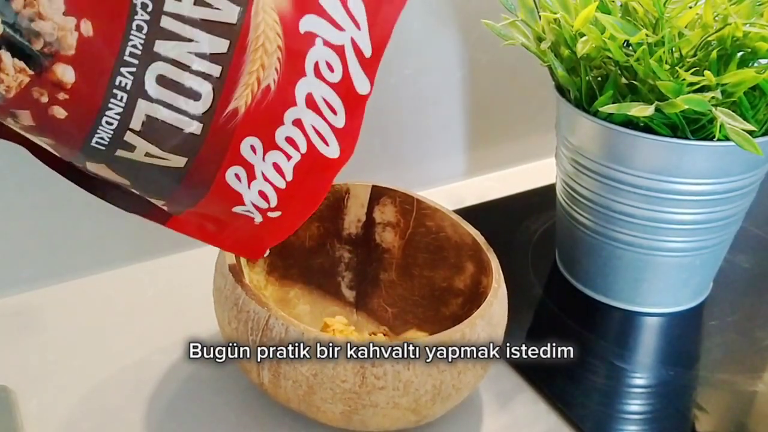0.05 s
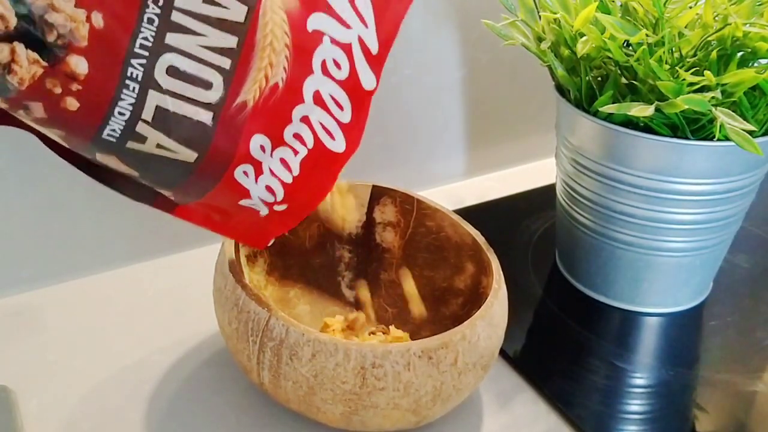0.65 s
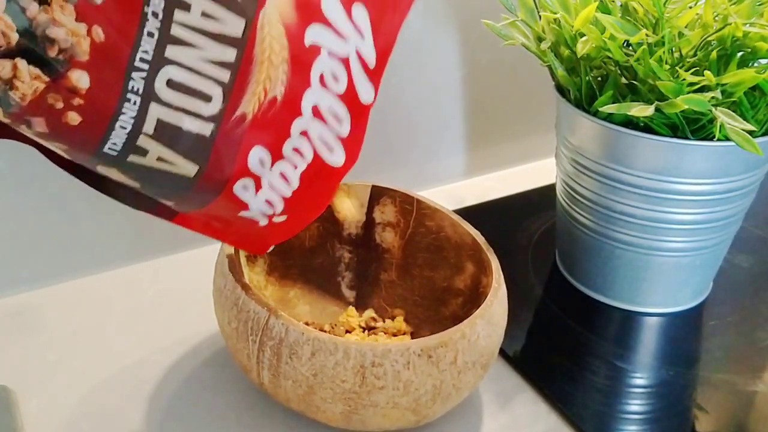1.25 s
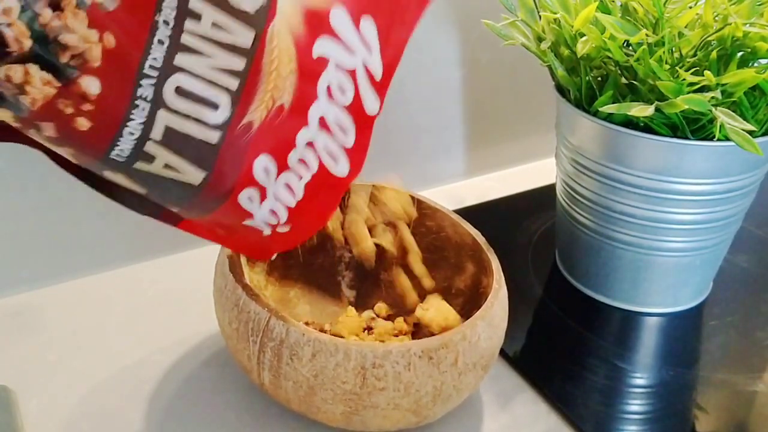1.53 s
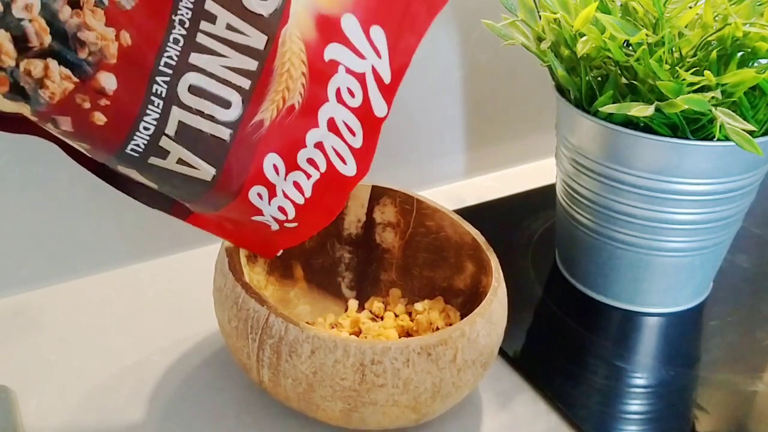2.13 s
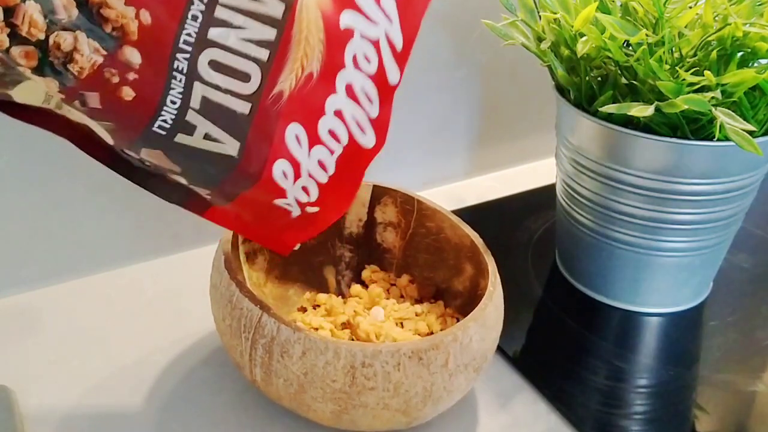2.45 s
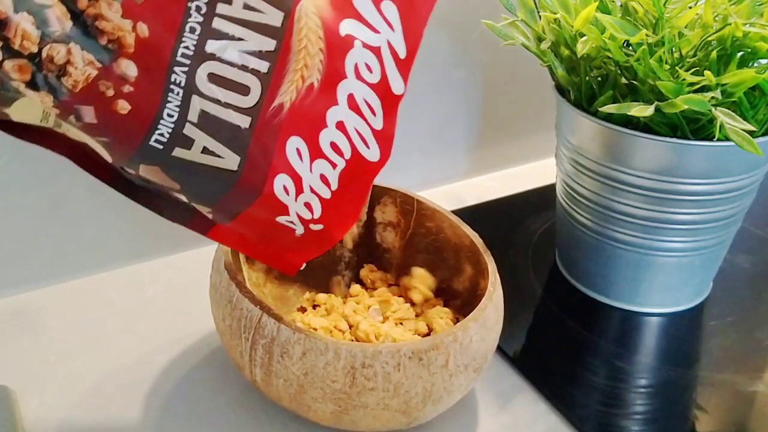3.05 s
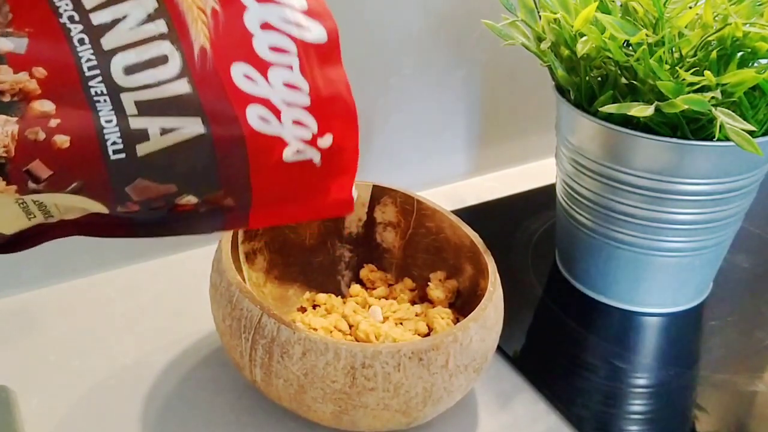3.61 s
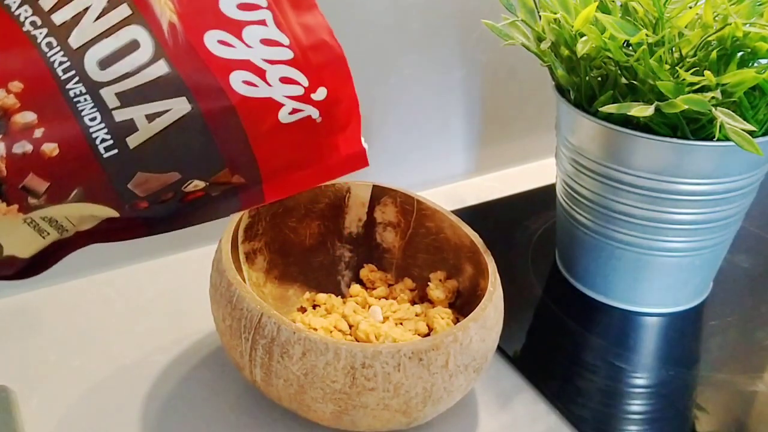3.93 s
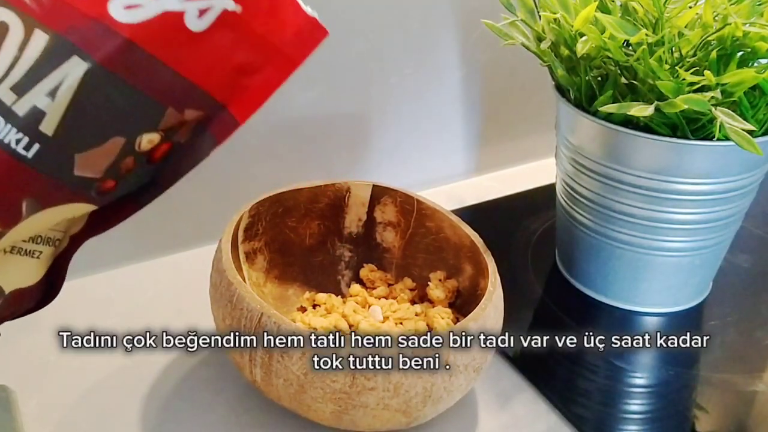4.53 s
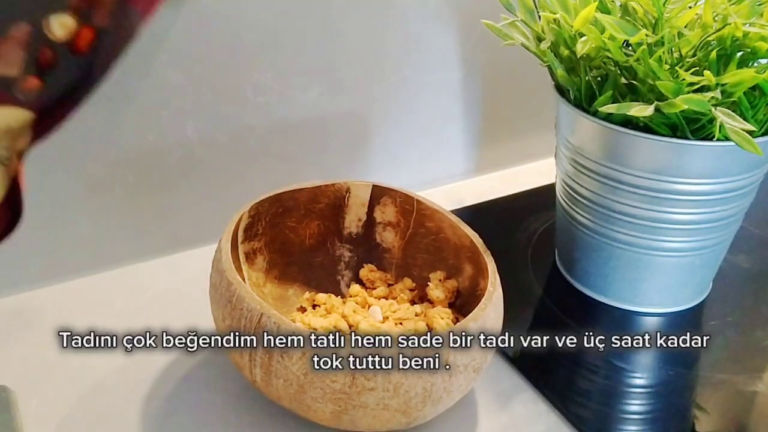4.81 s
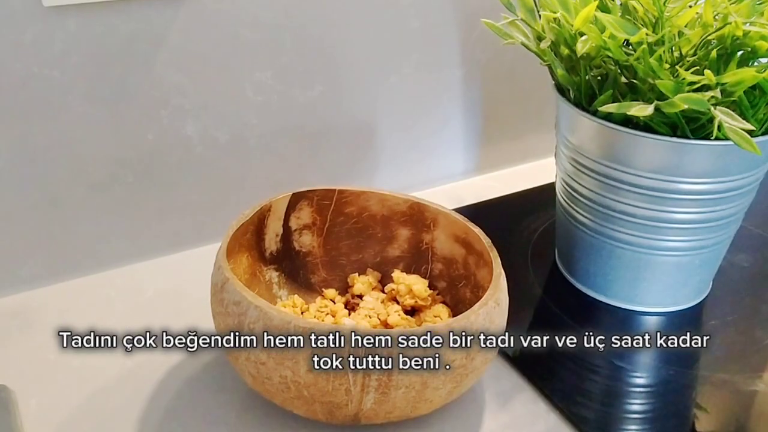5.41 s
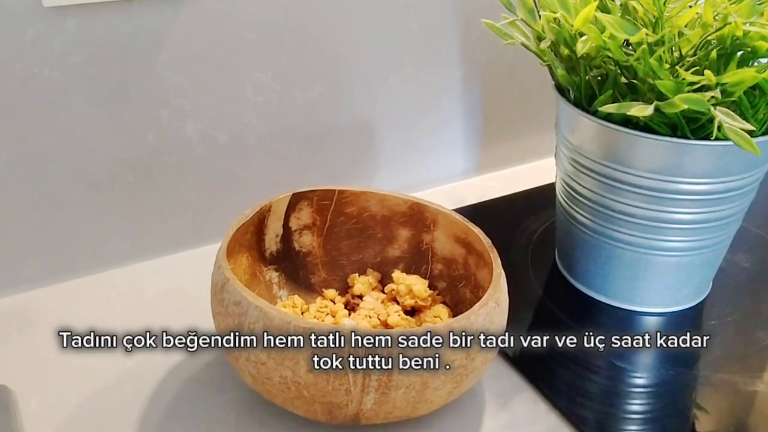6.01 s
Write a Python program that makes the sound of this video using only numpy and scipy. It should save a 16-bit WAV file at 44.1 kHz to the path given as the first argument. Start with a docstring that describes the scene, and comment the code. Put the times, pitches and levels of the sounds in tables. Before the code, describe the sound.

A plastic bag crinkles and snaps while dry cereal clusters rattle into a bowl, ending with a sliding rush that cuts off.

```python
"""Kitchen counter: granola is shaken from a plastic pouch into a coconut-shell bowl. The film snaps and
crackles; clusters slide and tumble in the pouch, drop and ring the hollow shell. The pouch is tipped upright
and its contents rush back; then all but the background breaks off abruptly. Room tone, a low handling rumble
and one faint whistle remain."""
import sys
import numpy as np
from scipy import signal
from scipy.fft import rfft, irfft, next_fast_len
from scipy.io import wavfile
from scipy.ndimage import uniform_filter1d

SR = 44100
rng = np.random.default_rng(int(sys.argv[2]) if len(sys.argv) > 2 else 0)


def store_wav(level_fs):
    """Save 16-bit WAV to argv[1]."""
    pcm = np.round(np.clip(np.atleast_2d(level_fs), -1, 1) * 32767)
    wavfile.write(sys.argv[1], SR, pcm.T.astype(np.int16))


N = 276066

# granola moving in the pouch: time_s, slide_db, crackle_db
FLOW = [(0.0, -45.5, -40), (0.1, -54, -67), (0.189, -42.5, -46), (0.42, -49, -62), (0.55, -46, -43),
        (0.72, -48, -59), (1.17, -54.5, -60), (1.23, -51.5, -58), (1.48, -42, -53), (1.6, -45, -41),
        (1.85, -54, -49.5), (2.0, -59.5, -54), (2.07, -45.5, -54.5), (2.35, -54.5, -58.5),
        (2.73, -47, -56.5), (2.87, -60, -67), (3.07, -60.5, -65), (3.3, -73, -83), (3.57, -66.5, -71.5),
        (3.701, -75.5, -80.5), (3.82, -61.5, -75.5), (3.95, -68, -77), (4.32, -58.5, -65.5),
        (4.5, -71.5, -74)]


def from_db(db):
    """Decibels to gain."""
    return 10 ** (np.asarray(db) / 20)


def rms_one(x):
    """Scale to unit rms."""
    return x / np.sqrt(np.mean(x ** 2) + 1e-20)


def unit_hit(x):
    """Scale to the energy of 4 ms at rms 1."""
    return x / np.sqrt(np.sum(x ** 2) / (SR / 250) + 1e-20)


def in_time(rows):
    """Curve columns at every sample."""
    time_s, *columns = np.transpose(rows)
    return [np.interp(np.arange(N) / SR, time_s, column) for column in columns]


def at_hz(points, hz):
    """Read a table on a log-frequency axis."""
    freq_hz, value = np.transpose(points)
    return np.interp(np.log(hz + 0.0009), np.log(freq_hz), value)


def while_moving(rows):
    """1 until a curve's last row, then a 0.1 s fade."""
    return np.clip(1 - 10 * (np.arange(N) / SR - rows[-1][0]), 0, 1)


def add(out, start_s, sound):
    """Mix a sound in at start_s."""
    i = max(int(start_s * SR), 0)
    out[i:i + len(sound)] += sound[:N - i]


def band(x, low_hz, high_hz):
    """Causal band-pass."""
    sos = signal.butter(2, [low_hz, min(high_hz, SR / 2 - 1000)], "band", fs=SR, output="sos")
    return signal.sosfilt(sos, x)


def colour(x, spectrum):
    """Minimum-phase shaping, so clicks stay sharp; rms 1."""
    size = 2 * next_fast_len(N // 2 + SR // 10)
    gain = from_db(at_hz(spectrum, np.fft.rfftfreq(size, 1 / SR)))
    cepstrum = irfft(np.log(gain))
    cepstrum[1:size // 2] *= 2
    cepstrum[size // 2 + 1:] = 0
    return rms_one(irfft(rfft(x, size) * np.exp(rfft(cepstrum)))[:N])


def ring(x, hz, t60_s):
    """One mode: a unit click starts a decaying sine of height 1."""
    r, w = np.exp(-np.log(1000) / (t60_s * SR)), 2 * np.pi * hz / SR
    return signal.lfilter([0, np.sin(w)], [1, -2 * r * np.cos(w), r * r], x + 1e-18)


def resonance(x, hz, width_hz):
    """Two-pole resonance, peak gain 1."""
    r, w = np.exp(-np.pi * width_hz / SR), 2 * np.pi * hz / SR
    return signal.lfilter(np.array([1, 0, -1]) * (1 - r * r) / 2, [1, -2 * r * np.cos(w), r * r], x + 1e-18)


def drift(rate_hz):
    """Random wander, rms 1."""
    position = np.arange(N) / SR * rate_hz
    values = rng.standard_normal(N // 100)
    return rms_one(np.interp(position, np.arange(len(values)), values))


def grains(per_s, spread_db, low_hz, high_hz, q, count=16):
    """Tiny random contacts of uneven size, each ringing at one of count pitches."""
    sizes = from_db(spread_db * np.minimum(rng.exponential(1, N), 3.5)) * rng.choice([-1, 1], N)
    clicks = sizes * (rng.random(N) < per_s / SR)
    pitch_index = rng.integers(0, count, N)
    pitches_hz = np.geomspace(low_hz, high_hz, count)
    out = sum(resonance(clicks * (pitch_index == k), hz, hz / q) for k, hz in enumerate(pitches_hz))
    power = np.abs(uniform_filter1d(out ** 2, SR // 10))
    return out / np.sqrt(power + 1e-12)   # levelled over 0.1 s


def burst(decay_s, ragged_db):
    """A run of micro-fractures: instant onset, exponential decay."""
    t = np.arange(SR // 16) / SR
    noise, sizes = rng.standard_normal((2, len(t)))
    return noise * from_db(ragged_db * sizes) * np.exp(-t / decay_s)


def strays(until_s, level_db, count, spread_db=0.5):
    """Small random events that follow the sliding level: start_s, level_db, chance (spread 1)."""
    when, size, kind = rng.random((count, 3)).T
    start_s = until_s * (np.arange(count) + when) / count
    flow_s, slide_db, _ = np.transpose(FLOW)
    db = np.interp(start_s, flow_s, slide_db) + level_db + spread_db * (2 * size - 1)
    return zip(start_s, db, np.sqrt(12) * (kind - .5))


def kitchen(x, near_db, near_t60_s, room_db):
    """Quick reflections from pouch, counter and wall, then a tail whose treble dies first."""
    # reverberation: freq_hz, t60_s
    decay = [(300, .45), (1000, 0.54), (3500, 0.19), (8000, 0.23), (15000, .2)]
    t = np.arange(SR // 2) / SR
    edges_hz = np.geomspace(120, 18000, 9)
    near = rng.standard_normal(len(t)) * from_db(-60 * t / near_t60_s) * (t > .002)
    tail = np.zeros(len(t))
    for low_hz, high_hz in zip(edges_hz, edges_hz[1:]):
        t60_s = at_hz(decay, np.sqrt(low_hz * high_hz))
        tail += band(rng.standard_normal(len(t)), low_hz, high_hz) * from_db(-60 * t / t60_s) * (t > .008)
    echo = from_db(near_db) * near / np.linalg.norm(near) + from_db(room_db) * tail / np.linalg.norm(tail)
    return x + signal.fftconvolve(x, echo)[:N]


def background(tone_db=-67.0, rumble_gain_db=3.5):
    """Steady room tone and the uneven rumble of a hand-held microphone."""
    # spectra: freq_hz, density_db
    tone_spectrum = [(25, -10), (50, -24.5), (100, -26.5), (165, -27), (215, -38), (350, -30), (530, -33.5),
                     (900, -27.5), (1500, -32.5), (2400, -40.5), (3300, -45.5), (5000, -57), (16000, -58)]
    rumble_spectrum = [(15, 6), (26, 8), (38, -3), (50, -0.5), (70, -0.5), (100, -2), (170, -2),
                       (215, -19.5), (500, -44)]
    # rumble envelope: time_s, level_db
    handling = [(0.0, -60), (3.1, -62.5), (3.5, -70), (5.07, -60.5), (5.5, -79), (6.26, -71.5)]
    handling_db, = in_time(handling)
    tone = from_db(tone_db) * colour(rng.standard_normal(N), tone_spectrum)
    rumble_gain = from_db(handling_db + rumble_gain_db + 1.5 * drift(2.2))
    return tone + rumble_gain * colour(rng.standard_normal(N), rumble_spectrum)


def whistle(start_s=5.75, length_s=.36, pitch_hz=3255, level_db=-90):
    """A barely audible tone, wavering in pitch and level."""
    out, size = np.zeros(N), int(length_s * SR)
    envelope = from_db(level_db + 2 * drift(30)[:size]) * signal.windows.tukey(size, .2)
    phase = 2 * np.pi * np.cumsum(pitch_hz + 15 * drift(25)[:size]) / SR
    add(out, start_s, envelope * np.sqrt(2) * np.sin(phase))
    return out


def granola(slide_gain_db=-2.0, crackle_gain_db=2.5, scrape_gain_db=-4.0, clack_db=-8.0):
    """Clusters grind and clack, crumbs tick in clumps on the film, the shaken film scrapes."""
    # spectra: freq_hz, density_db
    grind_spectrum = [(120, -17), (190, -6), (240, -2), (350, 5.5), (560, -3), (720, -0.5), (900, 6.5),
                      (1050, -0.5), (1300, 2), (1900, -3.5), (2800, -2), (4000, -17.5), (6500, -23),
                      (16000, -34)]
    crackle_spectrum = [(2500, -13.5), (4200, 4.5), (5500, -2), (7000, -2), (8300, 5.5), (9600, -4),
                        (12000, -3.5), (15500, 0)]
    scrape_spectrum = [(1500, -23.5), (2700, -9.5), (3600, 2.5), (4400, -1), (6000, -12), (12000, -33)]
    # film scrape envelope: time_s, level_db
    shaking = [(0.0, -39.5), (0.14, -62), (0.42, -49.5), (0.72, -35.5), (0.92, -51.5), (1.22, -61),
               (1.52, -38.5), (2.0, -65)]
    slide_db, crackle_db = in_time(FLOW)
    scrape_db, = in_time(shaking)
    grind = grains(per_s=2400, spread_db=4.0, low_hz=166, high_hz=9000, q=3.6, count=24)
    clack = grains(per_s=150, spread_db=4.5, low_hz=789, high_hz=2980, q=17.0, count=24)
    slide = colour(grind, grind_spectrum) + from_db(clack_db) * band(clack, 650, 3400)
    ticks = grains(per_s=4000, spread_db=3.5, low_hz=3500, high_hz=15000, q=7.6)
    crackle = colour(ticks * from_db(5 * drift(70)), crackle_spectrum)
    rubs = grains(per_s=480, spread_db=3.0, low_hz=2400, high_hz=5200, q=19.0)
    scrape = from_db(scrape_db + scrape_gain_db) * colour(rubs, scrape_spectrum)
    pouring = from_db(slide_db + slide_gain_db) * slide + from_db(crackle_db + crackle_gain_db) * crackle
    return pouring * while_moving(FLOW) + scrape * while_moving(shaking)


def rush(start_s=4.314, rise_s=0.74, level_db=-40.5, surge_db=2.5, contacts_per_s=9000):
    """The whole load slides back: contacts merge into a surging scrape that swells, then holds."""
    # freq_hz, density_db
    spectrum = [(160, -31), (230, -2), (360, 1.5), (560, -4.5), (850, -0.5), (1050, -1), (1350, 2.5),
                (1900, -6), (2900, -5.5), (4200, -13.5), (6500, -18.5), (8300, -12.5), (11000, -22.5),
                (15500, -16.5)]
    swell = np.clip((np.arange(N) / SR - start_s) / rise_s, 0, 1) ** 1.5
    contacts = rng.standard_normal(N) * (rng.random(N) < contacts_per_s / SR)
    contacts *= from_db(2 * drift(250))
    return swell * from_db(level_db + surge_db * drift(25)) * colour(contacts, spectrum)


def tumbles(gain_db=5.5, body_db=-11.0, stray_hz=1550, stray_octaves=.4):
    """Clusters fall on the slack pouch wall: dull, broad knocks over a low body."""
    # start_s, level_db, pitch_hz
    knocks = [(0.17, -50, 1470), (0.183, -39.5, 1400), (0.338, -47, 2030), (0.356, -48, 1260),
              (0.82, -42, 1560), (1.013, -46, 1220), (1.265, -43, 1500), (1.356, -46.5, 1580),
              (1.45, -33.5, 910), (1.489, -40, 2670), (2.0625, -37.5, 1920), (2.112, -43, 1030),
              (2.243, -37, 1080), (2.283, -45.5, 1420), (2.437, -48.5, 1090), (2.491, -43, 2003),
              (2.554, -41, 1090), (2.573, -47, 1280), (2.699, -46.5, 1457), (2.867, -57, 1200),
              (3.23, -58.5, 1116), (3.42, -64, 1460), (3.57, -59.5, 2060), (3.755, -56.5, 1030),
              (3.788, -56, 1280), (3.901, -61, 2290), (4.108, -59.5, 880), (4.18, -55, 1180),
              (4.209, -56.5, 1460), (4.285, -51, 1470), (4.575, -57, 1400), (4.66, -51, 1290),
              (4.812, -41.5, 1240), (4.878, -35, 1320), (4.993, -46, 1570)]
    small = [(start_s, db, stray_hz * 2 ** (stray_octaves * chance))
             for start_s, db, chance in strays(FLOW[-1][0], level_db=1.0, count=24)]
    out = np.zeros(N)
    for start_s, db, pitch_hz in knocks + small:
        contact = burst(0.0037, ragged_db=6.5)
        knock = unit_hit(band(resonance(contact, pitch_hz, width_hz=900), 750, 3400))
        body = from_db(body_db) * unit_hit(band(contact, 380, 710))
        add(out, start_s, from_db(db + gain_db) * (knock + body))
    return out


def shell(mode_gain_db=-4.0, heap_gain_db=-2.0, thud_below_hz=600):
    """Each landing strikes the shell's modes and thumps on the heap in the bowl."""
    # freq_hz, level_db, t60_s
    modes = [(238, -10, 0.26), (329.4, -7, 0.27), (360, -9, 0.15), (500, -6, 0.069), (657, -21.5, 0.08),
             (825, -11, 0.15), (901, -0.5, 0.062), (1003, -8.5, 0.05), (1313, -9, 0.043)]
    # start_s, ring_db, thud_db
    landings = [(0.129, -35.5, -52.5), (0.299, -38.5, -48.5), (0.448, -31.5, -43.5), (0.471, -40, -50),
                (0.555, -31, -48.5), (0.591, -34, -50), (0.679, -31, -46.5), (0.798, -40.5, -56),
                (1.443, -23, -52.5), (1.447, -22.5, -32.5), (1.557, -29, -45), (2.064, -35, -43),
                (2.555, -37, -47.5), (2.889, -46.5, -52.5), (2.916, -33.5, -48), (2.976, -49, -54)]
    out = np.zeros(N)
    for k, (hz, mode_db, t60_s) in enumerate(modes):
        blows = np.zeros(N)
        for start_s, ring_db, thud_db in landings:
            blow_db = thud_db if hz < thud_below_hz else ring_db
            # the cluster hits, its crumbs bounce on
            crumbs = burst(0.014, ragged_db=-1.5)
            blow = signal.unit_impulse(len(crumbs)) + 1.6 * crumbs / np.linalg.norm(crumbs)
            add(blows, start_s, from_db(blow_db + mode_db + mode_gain_db) * blow)
        out += (-1) ** k * ring(blows, hz, t60_s)
    for start_s, _, thud_db in landings:
        thump = unit_hit(band(burst(0.01, ragged_db=2.5), 220, 850))
        add(out, start_s, from_db(thud_db + heap_gain_db) * thump)
    return out


def fracture(decay_s, first_db=-10.5, flutter_db=-6.5):
    """A sharp first break, a run of smaller ones, then the flutter of crumpled film."""
    first = from_db(first_db) * unit_hit(burst(.0007, ragged_db=2.0))
    run = unit_hit(burst(decay_s, ragged_db=1.5))
    flutter = from_db(flutter_db) * unit_hit(burst(0.012, ragged_db=4.5))
    return first + run + flutter


def cracks(shaking_end_s=2.0, stray_decay_s=.0035, fizz_db=-3.0, film_hz=8350, film_db=3.5):
    """Film and brittle clusters crack; the film rings. Brighter: weaker, higher crunch, more fizz."""
    # start_s, level_db, brightness_db, decay_s
    breaks = [(0.045, -37, -4, .009), (0.125, -36, -2, .007), (0.203, -28, -0.5, .003),
              (0.2069, -25, -1.5, .005), (0.241, -33.5, 1, .004), (0.255, -34, -0.5, .004),
              (0.298, -23, -2.5, .004), (0.44, -44, -9.5, .01), (0.4489, -26.5, -4, .007),
              (0.452, -27, 1.5, .003), (0.473, -33.5, 0, .006), (0.519, -33.5, 8.5, .005),
              (0.556, -31.5, -4.5, .007), (0.564, -33, 8.5, .0035), (0.594, -43, -10, .007),
              (0.6783, -28.5, -13, .005), (0.702, -23.5, 7.5, .004), (0.734, -45, -14, .003),
              (0.796, -28.5, 2.5, .007), (0.847, -40, -1, .004), (0.9128, -25, 9, .0035),
              (0.931, -47, -16, .004), (0.993, -45.5, -7, .004), (1.013, -52.5, -13, .003),
              (1.093, -27, 16, 0.0046), (1.235, -44, 6, .0035), (1.268, -44.5, -6, .005),
              (1.317, -38, -4, .008), (1.365, -35.5, 2, .005), (1.444, -27, -1.5, .008),
              (1.474, -32, -3, .005), (1.518, -26, 7, 0.0032), (1.526, -24.5, 4, 0.0067),
              (1.535, -26.5, 4, .005), (1.556, -25.5, 8, .0055), (1.585, -25, 2.5, .009),
              (1.625, -28.5, 13.5, .0035), (1.69, -26.5, 13.5, .004), (1.709, -34, 9, .0035),
              (1.76, -34.5, 6, .006), (1.787, -36, 1, 0.0044), (1.823, -30.5, 10.5, .0045),
              (1.845, -36.5, -0.5, .005), (1.904, -32, -1, .007), (1.92, -36.5, 5, 0.0038),
              (2.0025, -35, 6, 0.0042), (2.062, -41, -2.5, .008), (2.308, -35.5, 5.5, .01),
              (2.399, -43.5, 22, .0025), (2.9154, -35, -5.5, .004), (3.059, -55, 0.5, .004),
              (3.226, -66.5, 20, .003), (3.762, -61.5, 7, .0035), (4.085, -60.5, 1, .004),
              (4.159, -65, -9, .0035), (4.279, -64, -5, .005), (4.878, -38, 0.5, .002)]
    small = [(start_s, db, chance - 3.0, stray_decay_s)
             for start_s, db, chance in strays(shaking_end_s, level_db=-0.5, count=16)]
    out = np.zeros(N)
    for start_s, db, brightness_db, decay_s in breaks + small:
        crack, snap = fracture(decay_s), fracture(decay_s)
        crunch = resonance(crack, 4150 + 28 * brightness_db, width_hz=1700)
        fizz = unit_hit(band(crack, 9200, 17000))
        add(out, start_s, from_db(db - brightness_db) * unit_hit(band(crunch, 2300, 5600)))
        add(out, start_s, from_db(db) * unit_hit(band(snap, 5300, 9400)))
        add(out, start_s, from_db(db + fizz_db + 0.51 * brightness_db) * fizz)
    return out + from_db(film_db) * resonance(out, film_hz, width_hz=530)


def scene():
    """Pouch, contents and bowl, each with its own reflections, gated over the background."""
    # a brief dropout, then the final stop: start_s, end_s
    silences = [(2.2972, 2.3062), (5.1455, 7)]
    t = np.arange(N) / SR
    silent = sum((t > start_s) & (t < end_s) for start_s, end_s in silences)
    gate = 1 - uniform_filter1d(silent.astype(float), size=40)
    pouch = kitchen(cracks(), near_db=-11.5, near_t60_s=0.04, room_db=-12.0)
    contents = kitchen(tumbles() + granola() + rush(), near_db=-9.0, near_t60_s=0.04, room_db=-13.0)
    bowl = kitchen(shell(), near_db=-11.5, near_t60_s=0.068, room_db=-19.0)
    return (gate * (pouch + contents + bowl) + background() + whistle())[None]


def record(dry):
    """Steep low-pass at 15.9 kHz."""
    return signal.sosfilt(signal.ellip(10, .2, 70, 15900, fs=SR, output="sos"), dry)


dry = scene()
out = record(dry)
store_wav(out)
```